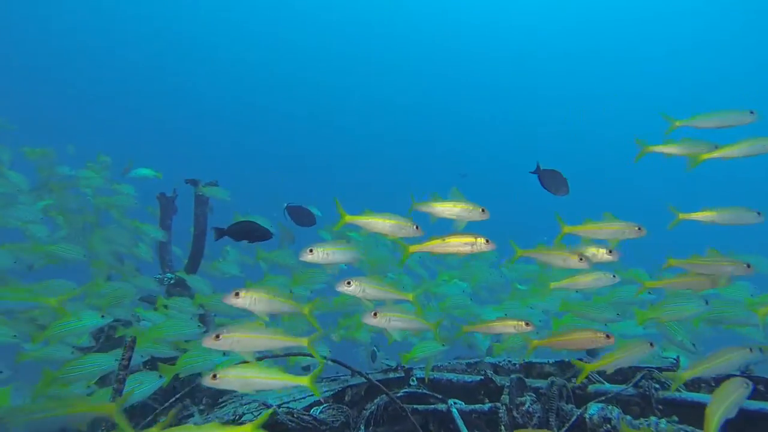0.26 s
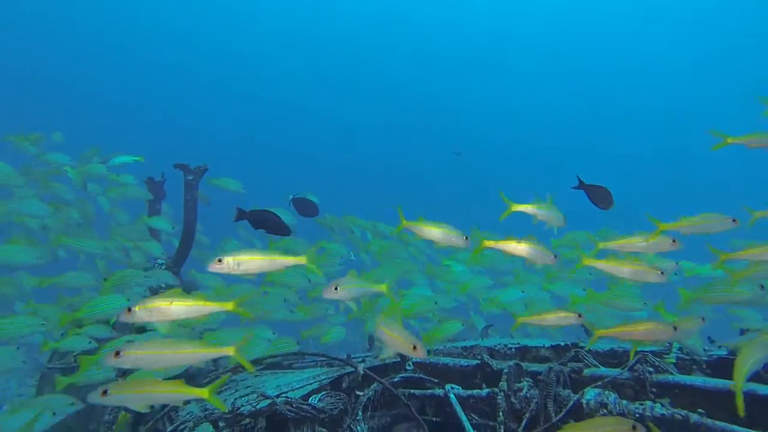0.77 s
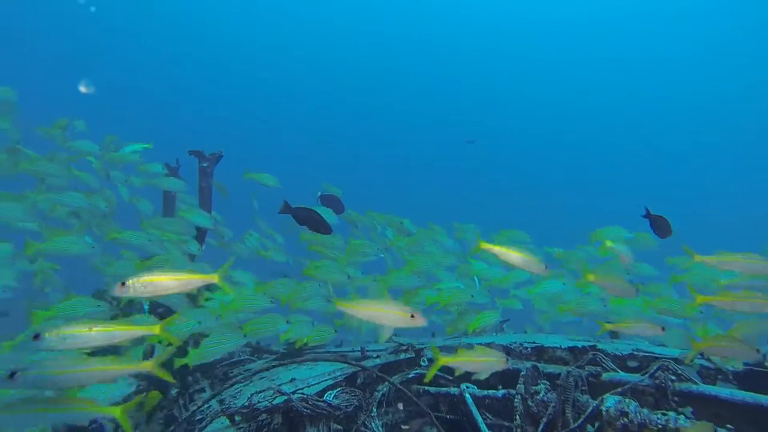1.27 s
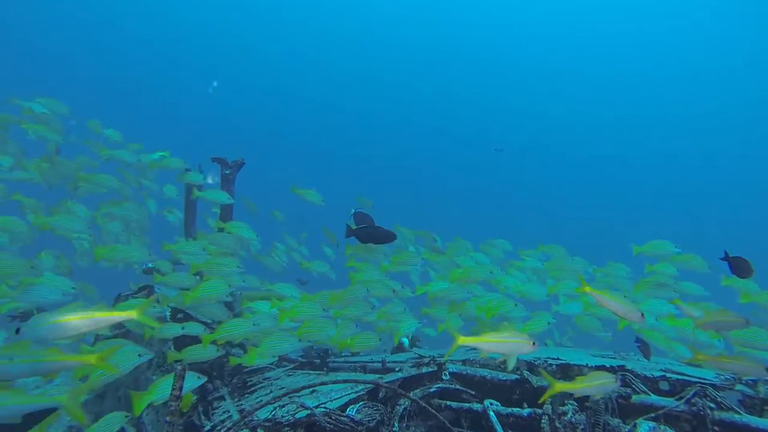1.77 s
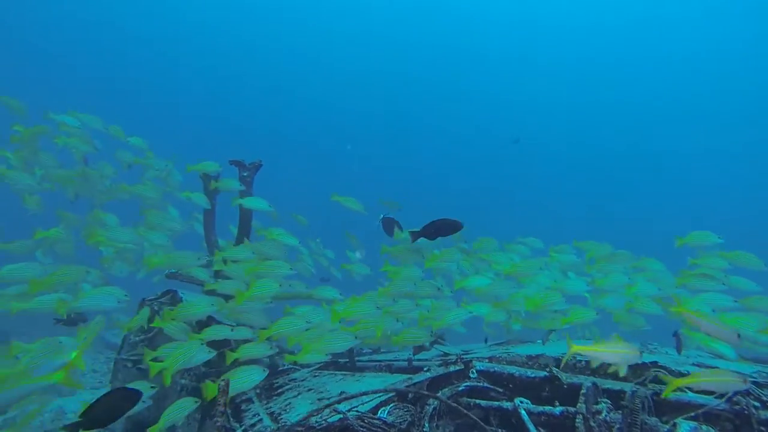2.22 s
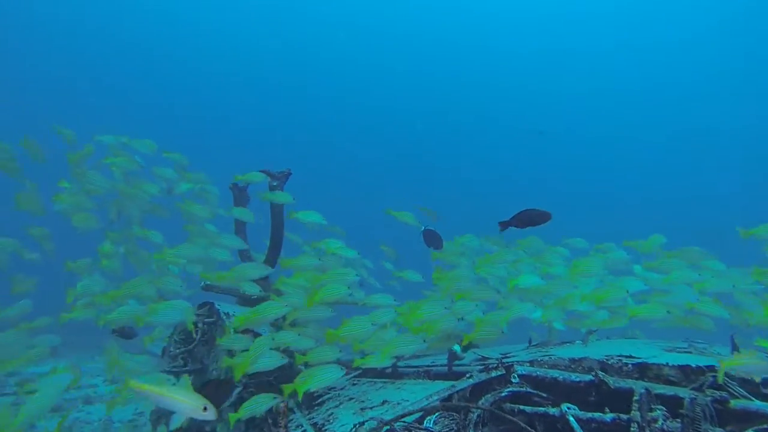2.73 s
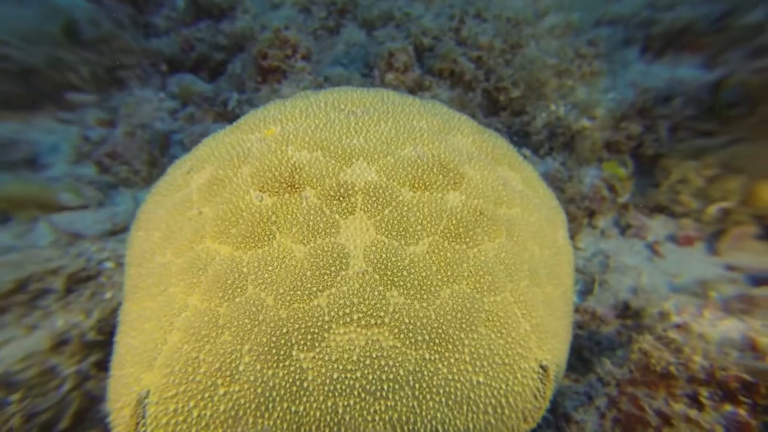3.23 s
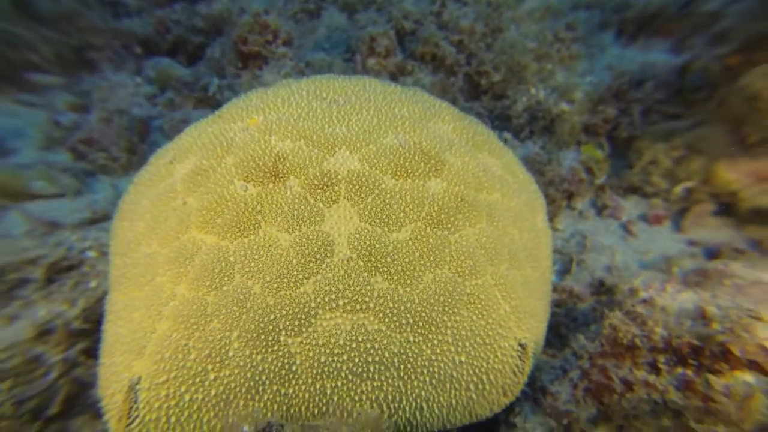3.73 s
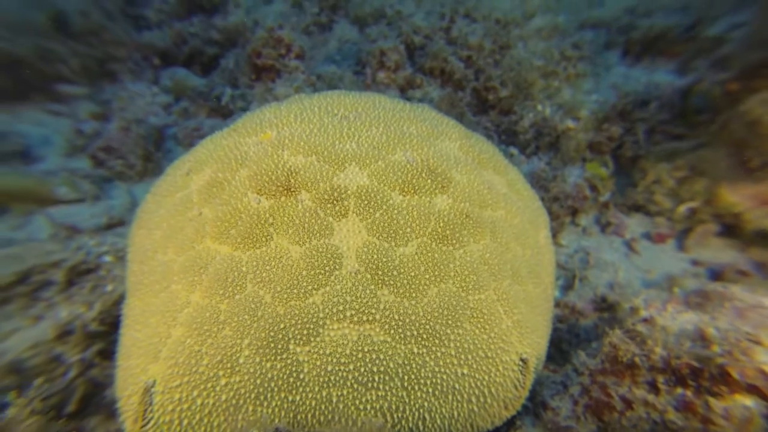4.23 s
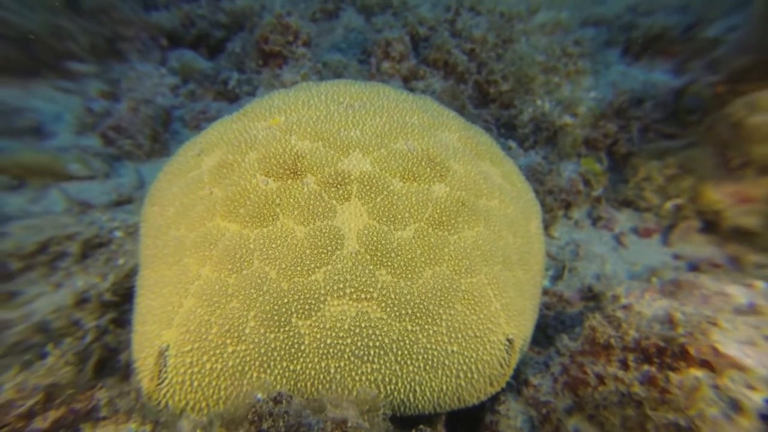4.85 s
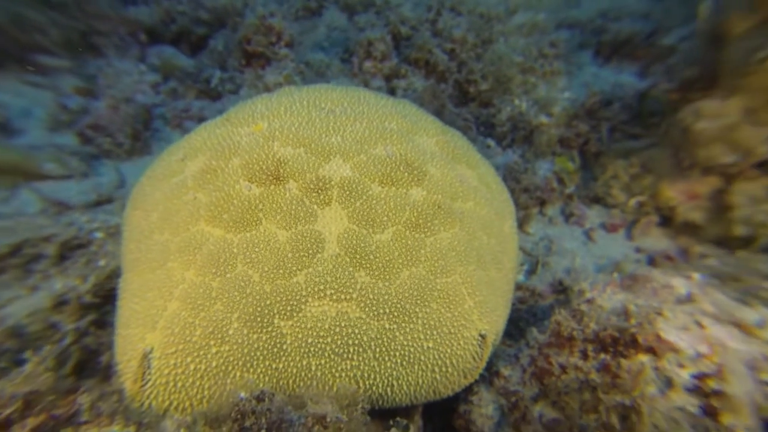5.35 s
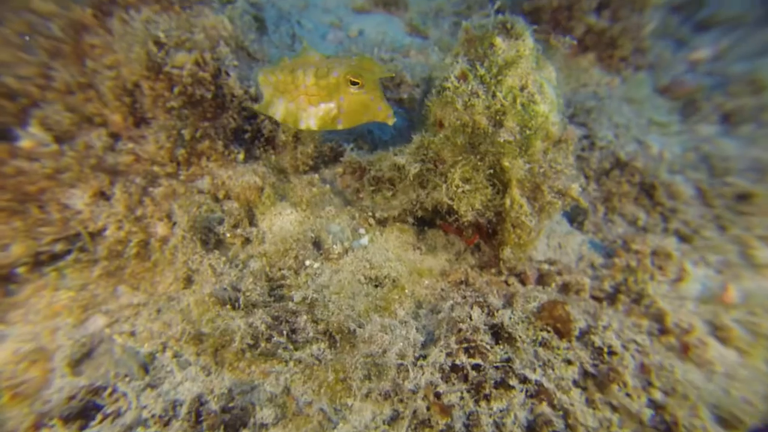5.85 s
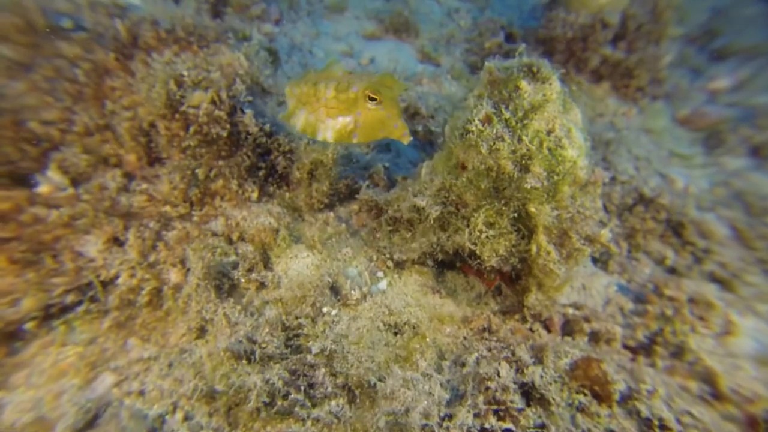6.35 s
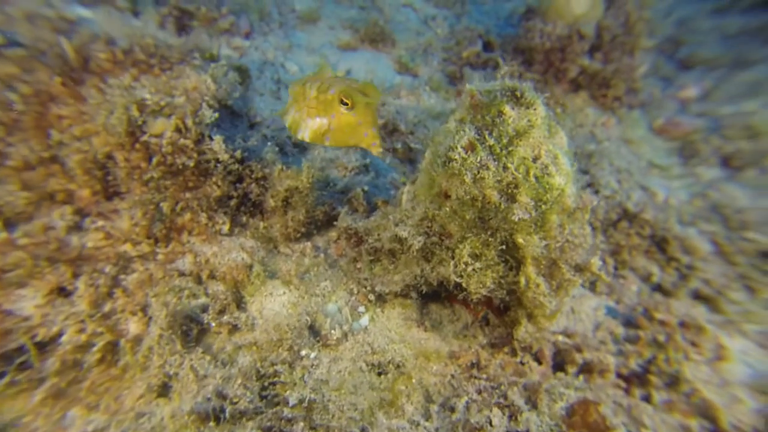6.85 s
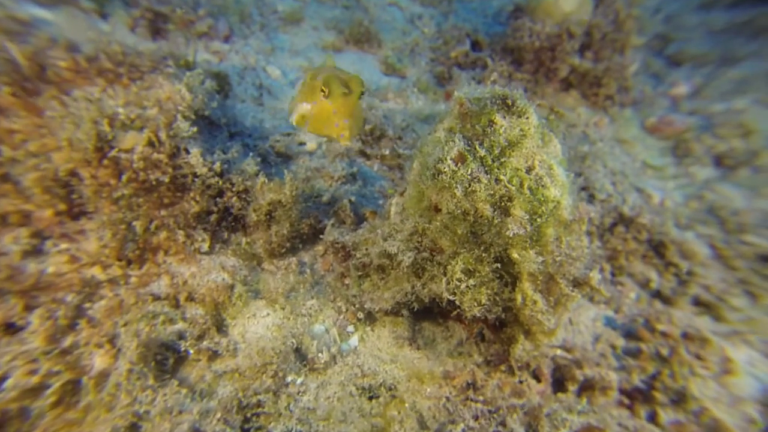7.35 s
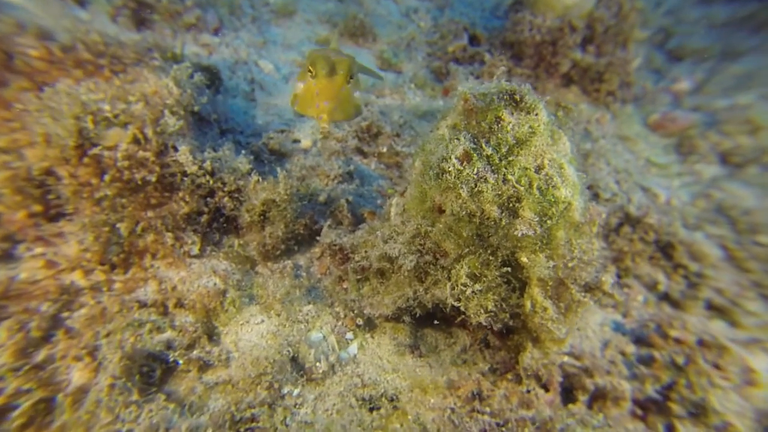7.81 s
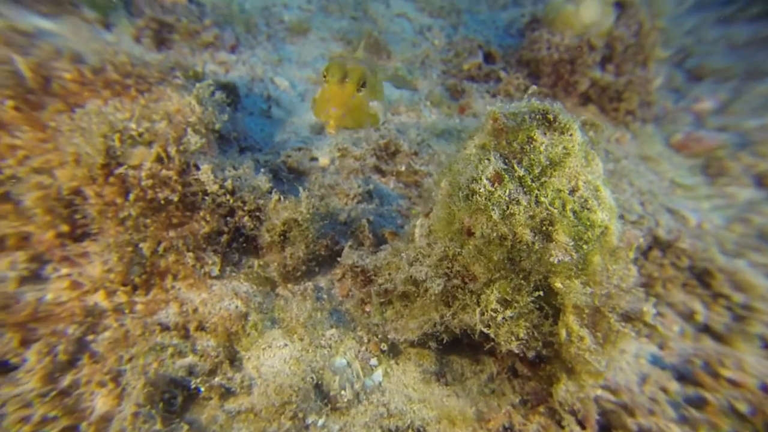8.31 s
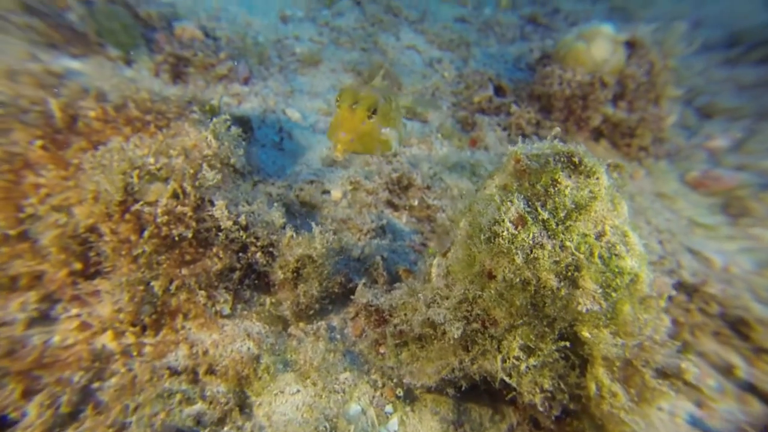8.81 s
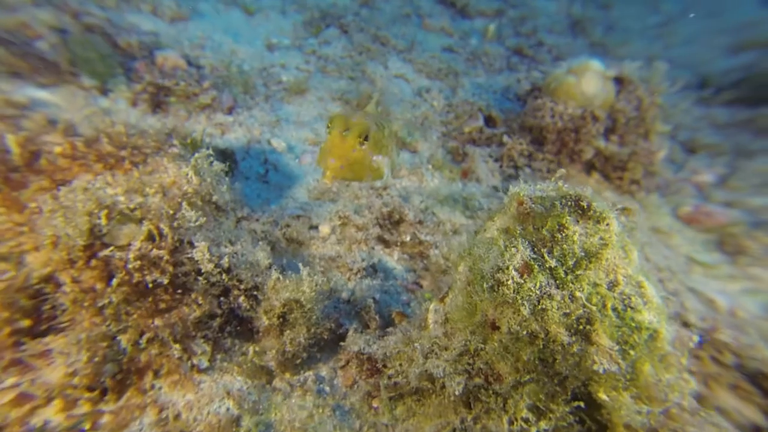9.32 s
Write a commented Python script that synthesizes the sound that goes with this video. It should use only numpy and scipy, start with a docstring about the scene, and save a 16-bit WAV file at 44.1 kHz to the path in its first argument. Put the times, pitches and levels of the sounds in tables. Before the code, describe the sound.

Faint underwater hiss and crackling shrimp, with dull knocks and rubs on a plastic camera case and a thin electronic whine.

```python
"""A small camera in a sealed plastic housing on a reef. From the start, water hiss and rumble come dull
through the case, shrimp snap near and far, soft blips sound and the circuit whines at the picture rate.
Fingers rub and knock the case lightly near 1 s. Near 2.9 s come the hardest knocks, with pushes and
thuds, and the water swells. The whine and fizz step louder at 3.06 s and 5.83 s. Scattered knocks go on,
ending in more rubbing around 9 s."""
import sys
import numpy as np
from scipy import signal
from scipy.io import wavfile
from scipy.ndimage import uniform_filter1d

SR = 44100
rng = np.random.default_rng(int(sys.argv[2]) if len(sys.argv) > 2 else 0)


def bounce(signal):
    """Save signal as a 16-bit WAV file at the path given by the first command-line argument."""
    frames = np.transpose(np.atleast_2d(signal))
    limited = np.clip(frames, -1, 1)
    pcm = np.round(limited * 32767).astype(np.int16)
    wavfile.write(sys.argv[1], SR, pcm)


N = 422478
FRAMES_PER_S = 24000 / 1001


def gain_of(db):
    return 10 ** (np.asarray(db) / 20)


def unit_rms(x):
    return x / np.sqrt(np.mean(x ** 2) + 1e-20)


def add(mix, start_s, sound):
    part = mix[round(start_s * SR):][:len(sound)]
    part += sound[:len(part)]


def band(x, lo_hz, hi_hz, order=2):
    sos = signal.butter(order, [lo_hz, min(hi_hz, SR / 2.1)], "band", fs=SR, output="sos")
    return signal.sosfilt(sos, x)


def wander(span_samples):
    """Smooth random curve, unit RMS."""
    noise = rng.standard_normal(N)
    return unit_rms(uniform_filter1d(uniform_filter1d(noise, span_samples), span_samples))


# Whine and fizz level steps. Each row: start in seconds, whine gain in dB, fuzz level in dB.
LEVEL_STEPS = [(0, -4.2, -83), (3.06, -1.5, -79), (5.83, -1.2, -75)]

def stepped_levels():
    """Whine gain and fuzz level in dB at every sample."""
    start_s, whine_db, fuzz_db = np.transpose(LEVEL_STEPS)
    step = np.searchsorted(start_s[1:], np.arange(N) / SR)
    return whine_db[step], fuzz_db[step]


def circuit_fizz():
    """Fuzz near the lens port resonance, and treble hiss that pulses with the frames."""
    whine_db, fuzz_db = stepped_levels()
    fuzz = unit_rms(band(rng.standard_normal(N), 3080, 3360))
    hiss = unit_rms(band(rng.standard_normal(N), 6700, 7650))
    phase = np.arange(N) / SR * FRAMES_PER_S % 1
    pulse_db = np.interp(phase, [0, .07, .12, .2, .55, .65, 1], [-3.5, -7.5, -16, 1.8, 1.7, -4.5, -2.5])
    return gain_of(fuzz_db) * fuzz + gain_of(-70.5 + pulse_db + whine_db) * hiss


# Whine tones. Each row: pitch in Hz, level before whine gain in dB, on time and off time in frames.
FRAME_TONES = [(5328, -66.2, .14, 1.07), (6859, -85, .14, 1.07), (6587, -81, .14, 1.07)]

def circuit_tones():
    """Tones that break off briefly and restart once per picture frame."""
    frames, out = np.arange(N) / SR * FRAMES_PER_S, np.zeros(N)
    whine_db, _ = stepped_levels()
    for hz, db, on, off in FRAME_TONES:
        phase = (frames - on) % 1
        gate = np.clip(np.minimum(phase, off - on - phase) / 0.0052, 0, 1)
        out += gain_of(db) * np.sqrt(2) * gate * np.sin(2 * np.pi * hz * phase / FRAMES_PER_S)
    return out * gain_of(whine_db)


# Frames with a higher chirp, mostly every fifteenth. Each entry: frame number.
KEY_FRAME_NUMBERS = [*range(8, 73, 15), *range(74, 140, 15), *range(141, 230, 15)]

def circuit_chirp():
    """One chirp per frame, sliding to a common end pitch; key frames start higher."""
    start_hz, key_start_hz, end_hz = 2545, 2760, 2690
    on, slide_from, slide_to, off = .22, .53, .63, .8  # fractions of a frame
    frames = np.arange(N) / SR * FRAMES_PER_S
    number = frames.astype(int)
    start_turns, detune, size, shift = rng.standard_normal((number[-1] + 1, 4))[number].T
    phase = frames % 1 + 0.013 * shift
    waver = unit_rms(uniform_filter1d(rng.standard_normal(N), 200))
    hz = np.where(np.isin(number, KEY_FRAME_NUMBERS), key_start_hz, start_hz)
    hz = hz + (end_hz - hz) * np.clip((phase - slide_from) / (slide_to - slide_from), 0, 1)
    turns = np.cumsum(hz * (1 + 0.0055 * detune + 0.00612 * waver)) / SR + start_turns
    gate_db = -25 * np.clip(np.maximum(on - phase, phase - off) / .05, 0, 1)
    flicker_db = 1.1 * size + 1.5 * np.roll(waver, N // 2)
    whine_db, _ = stepped_levels()
    return gain_of(-59.5 + gate_db + flicker_db + whine_db) * np.sin(2 * np.pi * turns)


# Water movement. Each row: time in seconds, hiss level in dB, surge level in dB, rumble level in dB.
WATER_LEVELS = [(0, -63.5, -60, -63), (.8, -63, -63, -66), (1.4, -62.5, -58, -59), (1.76, -61.5, -61, -66),
                (2.5, -64.5, -58, -66), (2.9, -58, -49, -51), (3.1, -59.5, -52, -60),
                (3.5, -66.5, -61, -61), (4.3, -65.5, -59, -59), (4.6, -61, -55, -58),
                (5.1, -65.5, -60, -61), (5.95, -66.5, -60, -60), (6.43, -62, -60, -58),
                (7.2, -65.5, -64, -60), (8, -64.5, -63, -59), (8.4, -64, -59, -60), (8.8, -64, -55, -61),
                (9.58, -64.5, -62, -66)]

def water_motion():
    """Hiss, surge and rumble levels in dB at every sample."""
    time_s, *levels_db = np.transpose(WATER_LEVELS)
    return [np.interp(np.arange(N) / SR, time_s, db) for db in levels_db]


def water_surge():
    """Water pressing on the case: two low bands of noise that flutter."""
    _, surge_db, rumble_db = water_motion()
    surge = unit_rms(band(rng.standard_normal(N), 12, 44))
    rumble = unit_rms(band(rng.standard_normal(N), 39, 193))
    flutter_db, span_samples = 3, round(.08 * SR)
    return (surge * gain_of(surge_db + flutter_db * wander(span_samples))
            + rumble * gain_of(rumble_db + flutter_db * wander(span_samples)))


# Hiss spectrum through the case. Each row: frequency in Hz, relative density in dB.
HISS_SPECTRUM = [(90, -25), (150, -4), (320, -5), (510, -8), (800, -5.5), (1300, -8.5), (2300, -14),
                 (2850, -20), (3200, -13), (4390, -21.5), (5150, -14.5), (6100, -22), (6980, -19.5),
                 (7700, -23.5)]

def water_hiss():
    """Hiss with drifting patches; the low part follows the water movement most."""
    slices, bin_hz = N // 256 + 5, np.fft.rfftfreq(1024, 1 / SR)
    real, imag, patches = rng.standard_normal((slices, 513, 3)).T
    patches_db = 2 * unit_rms(uniform_filter1d(uniform_filter1d(patches, 10, 0), 8, 1))
    hz, db = np.transpose(HISS_SPECTRUM)
    colour_db = np.interp(np.log(bin_hz + 1), np.log(hz + 1), db)
    spectrum = (real + 1j * imag) * gain_of(colour_db[:, None] + patches_db)
    hiss = signal.istft(spectrum, nperseg=1024, noverlap=768)[1][:N]
    hiss /= np.std(band(hiss, 150, 1200))
    low = signal.sosfilt(signal.butter(2, 1200, fs=SR, output="sos"), hiss)
    low_db, _, _ = water_motion()
    high_db = low_db.mean() - 1.31 + 0.37 * (low_db - low_db.mean())
    return low * gain_of(low_db) + (hiss - low) * gain_of(high_db)


def blip(hz):
    """A few cycles that rise in pitch, likely a small bubble."""
    t = np.arange(2000) / SR
    envelope = 1.8 * (1 - np.exp(-t / 0.0029)) * np.exp(-t / 0.0062)
    return envelope * np.sin(2 * np.pi * hz * t * (0.93 + 6.2 * t))


# Louder blips. Each row: start in seconds, level in dB, nominal pitch in Hz.
LOUD_BLIPS = [(0.43, -46, 288), (0.886, -46.5, 295), (1.541, -45, 200), (1.933, -43.5, 354),
              (4.291, -45, 331), (6.639, -44.5, 297), (7.082, -40, 283), (7.391, -43.5, 270),
              (7.545, -45.5, 270), (8.208, -44, 208)]

def blips():
    """A few soft low blips over 150 faint ones."""
    out = np.zeros(N)
    for start_s, db, hz in LOUD_BLIPS:
        add(out, start_s, gain_of(db) * blip(hz))
    for when, size, pitch in rng.random((150, 3)):
        add(out, when * N / SR, gain_of(-61 + 13 * size) * blip(170 * 2 ** (1.2 * pitch)))
    return out


def snap(low_db, noise, hz):
    """A collapsing bubble: a click with a scattered tail rings the lens port; its lower part lingers."""
    t = np.arange(len(noise)) / SR
    click = noise * (np.exp(-t / .0014) + 0.18 * np.exp(-t / 0.0049))
    port = 2 * band(click, 2970, 3140, order=1) + 2.3 * band(click, 2450, 2650, order=1)
    edge = 0.12 * band(click, 5000, 5400) + gain_of(-10 + 4 * noise[-1]) * band(click, 5400, 7600)
    high = band(click, hz / 1.2, hz * 1.17) + port + edge
    low = band(noise * np.exp(-t / 0.0036), 900, 2400)
    return high / abs(high).max() + gain_of(low_db) * low / abs(low).max()


def far_shrimp(snaps_per_s=60):
    """Fine crackle of distant snaps in 16 timbres."""
    out = np.zeros(N)
    size_db = 3.5 * np.minimum(rng.exponential(1, N), 2.5)
    impulses = gain_of(-62.5 + size_db) * (rng.random(N) < snaps_per_s / SR)
    timbre = rng.integers(0, 16, N)
    for k, low_db in enumerate(np.linspace(-16, 3, 16)):
        sound = snap(low_db, rng.standard_normal(1200), hz=3300 * 1.15 ** rng.standard_normal())
        out += signal.oaconvolve(impulses * (timbre == k), sound)[:N]
    return out


# Close snaps. Each row: start in seconds, peak of the high part in dB, low part relative to it in dB.
NEAR_SNAPS = [(0.108, -47.5, 0), (0.835, -53, 7), (0.858, -48, 6), (0.961, -50, -6), (1.113, -42, -5),
              (1.214, -49, 1), (1.677, -38.5, -0.5), (1.919, -56.5, 10.5), (1.989, -48.5, 7),
              (2.279, -46.5, 2), (3.469, -42, -19), (4.289, -46, -7), (4.376, -54, 8), (4.527, -45, -24),
              (4.578, -58, 21), (4.829, -46.5, 0.5), (5.223, -43.5, -23), (5.405, -44.5, -8),
              (5.782, -45, -17), (5.881, -46, -2), (5.979, -52, 8.5), (6.126, -41.5, -10),
              (6.201, -44, -1.5), (6.897, -44.5, 1), (6.913, -44.5, 4.5), (6.94, -45, -5), (7.149, -47, -7),
              (7.269, -47, -4), (7.644, -50.5, 7), (8.016, -45, -4), (8.142, -42, 0.5), (8.549, -46, -16),
              (8.742, -44.5, -14), (8.839, -46, -10), (9.231, -47.5, 0), (9.292, -47.5, 1.5),
              (9.332, -40.5, -0.5), (9.362, -47, 7.5)]

def near_shrimp():
    """Single snaps close by, each at a slightly different pitch."""
    out = np.zeros(N)
    for start_s, db, low_db in NEAR_SNAPS:
        hz = 3330 * (1 + .07 * rng.standard_normal())
        add(out, start_s, gain_of(db) * snap(low_db, rng.standard_normal(1199), hz))
    return out


# Housing modes in five groups: flat walls, main ring, lower and upper stiff corners, lens port.
# Each row of a group: frequency in Hz, relative level in dB, T60 in seconds.
HOUSING_MODES = [
    [(433.4, -2, 0.052), (509, -10.5, 0.036)],
    [(601, -3.5, 0.036), (695.6, 4, 0.037), (768, 1.5, 0.045), (871, -7.5, 0.047)],
    [(1014, -1.5, .05), (1125, -1.5, 0.033), (1220, -1.5, 0.032)],
    [(1410, -2, 0.049), (1562, 0, 0.031), (1726, -3, 0.031), (1927, -7, 0.032)],
    [(2100, -16, 0.031), (2540, 3, 0.034), (2900, -5, 0.011), (3200, -6, 0.029)],
]

def housing_ring(groups_db, scatter, pitch_ratio, t60_ratio):
    """Modes of the soft plastic swell over a few cycles and decay; scatter varies level and phase."""
    t, out, k = np.arange(SR // 8) / SR, 0, 0
    for modes, group_db in zip(HOUSING_MODES, groups_db):
        group = 0
        for hz, db, t60_s in modes:
            swell = 1 - np.exp(-(t * hz / 1.42) ** 2)
            decay = gain_of(db + 1.56 * scatter[k] - 60 * t / (t60_s * t60_ratio))
            group += swell * decay * np.sin(2 * np.pi * hz * pitch_ratio * t + 1.19 * scatter[k + 20])
            k += 1
        out += gain_of(group_db) * group / abs(group).max()
    return out


# Finger strokes. Each row: start in seconds, length in seconds, level in dB.
FINGER_RUBS = [(.2, .25, -64), (1.1, .12, -57), (1.22, .23, -66), (2.85, .12, -47), (2.98, .11, -56),
               (3.26, .16, -62), (4.57, .09, -57), (8.55, .2, -68), (8.76, .05, -57), (8.83, .25, -55),
               (9.08, .22, -62)]

def rubbing(slips_per_s=500, attack_s=.02, release_s=.03):
    """Uneven slips of skin on plastic excite the housing."""
    size_db = 2.2 * np.minimum(rng.exponential(1, N), 3)
    slips = gain_of(size_db) * (rng.random(N) < slips_per_s / SR) * rng.choice([-1., 1.], N)
    ring = housing_ring([-8, 0, -18, -11, -35], np.zeros(40), pitch_ratio=1.03, t60_ratio=1.38)
    friction, out = unit_rms(signal.oaconvolve(slips, ring)[:N]), np.zeros(N)
    for start_s, length_s, db in FINGER_RUBS:
        t = np.arange(0, length_s, 1 / SR)
        stroke = np.minimum(np.minimum(t / attack_s, (length_s - t) / release_s), 1)
        add(out, start_s, gain_of(db) * stroke * friction[round(start_s * SR):][:len(t)])
    return out


# Pushes on the case. Each row: start in seconds, level before filtering in dB, length in seconds.
CASE_PUSHES = [(2.769, -32.5, 0.0061), (2.91, -11, 0.0062), (2.987, -20, 0.0032), (6.316, -37, 0.0047),
               (8.535, -36, 0.0044)]

def pushes():
    """The case dents and springs back."""
    out, t = np.zeros(N), np.arange(SR // 3) / SR
    for start_s, db, length_s in CASE_PUSHES:
        dent = -np.clip(np.minimum(t, length_s - t) / 0.00085, 0, 1) * np.exp(-t / 0.0064)
        add(out, start_s, gain_of(db) * band(dent, 16, 1500, order=1))
    return out


# Thuds on the mount. Each row: start in seconds, level in dB, frequency in Hz, T60 in seconds.
MOUNT_THUDS = [(2.875, -24.5, 16, 0.24), (2.907, -27, 270, 0.11), (2.915, -19.5, 19, 0.27),
               (2.988, -23.5, 144, 0.15), (2.995, -35, 325, 0.21), (3.2, -34.5, 24, 0.84),
               (4.507, -23, 29, .25), (4.6, -38, 350, 0.1), (4.597, -25, 29.5, .3),
               (5.453, -40.5, 122, 0.14), (5.699, -39, 112, 0.19), (6.319, -44, 90, 0.64),
               (6.37, -38.5, 30.4, 0.6), (8.17, -40, 25, 0.33), (8.364, -34.5, 120, .1),
               (8.541, -41, 103, .2), (8.6, -31.5, 20, .2), (9.1, -42.5, 142, 0.11)]

def thuds():
    """The camera swings and sets its mount ringing."""
    out, t = np.zeros(N), np.arange(SR // 3) / SR
    for start_s, db, hz, t60_s in MOUNT_THUDS:
        rise_s = .003 + .2 / hz
        envelope = gain_of(db - 60 * t / t60_s) * (1 - np.exp(-(t / rise_s) ** 2))
        add(out, start_s, -envelope * np.sin(2 * np.pi * hz * t))
    return out


# Blows on the case. Each row: start in seconds, main ring level in dB, then walls, corners and
# lens port in dB relative to it, pitch ratio, T60 ratio.
CASE_KNOCKS = [(0.858, -50, -22, 12, -17, 1.4, .8), (1.069, -31.5, -21, 2, -1, 0.99, 1.4),
               (1.129, -41.5, -21, -13, -19, 1.13, 1.05), (1.179, -36, -14, -8, -17, 1.13, 2.2),
               (1.258, -44, -13, -9, -19, 1.12, 1.01), (1.278, -43, -14, -14, -26, 1.22, .9),
               (1.349, -42, -16, -12, -18, 1.28, 1.01), (1.988, -47, -19, 4, -16, 1.29, .89),
               (2.637, -47, -13, -13, -18, 1.05, 1.05), (2.869, -13.5, -14, -11, -42, 0.93, .9),
               (2.916, -35.5, -1, -10, -16, 1.01, 1.01), (2.975, -16.5, -21, -17, -38, 0.88, .73),
               (3.225, -28, -18.5, -32, -37, 0.94, 1.16), (3.263, -57, -11, 11, -5, 1.08, 1.01),
               (3.87, -26.5, -18.5, -16, -24, 0.99, .93), (4.526, -49, -15, -2, 7, 1.03, 1.05),
               (4.588, -20.5, -7.5, -14, -42, 1.006, .6), (4.594, -30, -3, -16, -29, 1.01, 1.01),
               (5.39, -41, -22, -13, -16, 0.98, 1.2), (5.452, -23, -3.5, -18, -40, 1.01, 1.01),
               (5.698, -14.5, -13.5, -23, -40, 1.04, 1.1), (6.134, -27, -7.5, -22, -32, 1.005, 1.1),
               (6.316, -58.5, 10, -15, -7, 1.06, 1.1), (6.896, -47, -22, 5, -8, 1.2, .81),
               (7.015, -59, -11, 9, -4, 1.01, 1.01), (7.541, -52.5, -9, 9, 1, 1.01, .72),
               (8.105, -57.5, -18, 10, 0, 1.16, .87), (8.362, -20, -8.5, -23, -37, 1.035, 1.3),
               (8.659, -48.5, -3.5, -18, -18, 0.96, 1.2), (8.899, -46, -17, -12, -12, 1.16, .87),
               (9.085, -45, -20, -20, -19, 1.01, 1.3), (9.097, -41.5, -6, -14, -24, 1.01, .93)]

def knocks():
    """Where a blow lands decides which modes ring; loose parts rattle and roughen the ring."""
    out = np.zeros(N)
    rattle = 1 + 0.29 * wander(span_samples=90)
    for start_s, db, wall_db, corner_db, port_db, pitch_ratio, t60_ratio in CASE_KNOCKS:
        groups_db = [wall_db, 0, corner_db, corner_db - 4, port_db]
        ring = housing_ring(groups_db, rng.standard_normal(40), pitch_ratio, t60_ratio)
        add(out, start_s, gain_of(db) * ring)
    return out * rattle


def scene():
    """Mono sum of all sources."""
    water = water_hiss() + water_surge()
    handling = rubbing() + knocks() + pushes() + thuds()
    reef = blips() + near_shrimp() + far_shrimp()
    circuit = circuit_tones() + circuit_chirp() + circuit_fizz()
    return (water + handling + reef + circuit)[None]


def record(dry):
    """Steep low-pass, plus faint converter noise."""
    cutoff_hz, noise_db = 7670, -104
    taps = signal.firwin(1023, cutoff_hz, window=("kaiser", 9), fs=SR)[None]
    noise = gain_of(noise_db) * rng.standard_normal(dry.shape)
    return signal.oaconvolve(dry, taps, "same") + noise


dry = scene()
out = record(dry)
bounce(out)
```